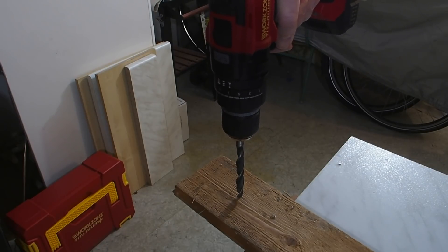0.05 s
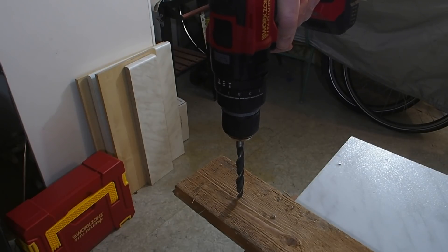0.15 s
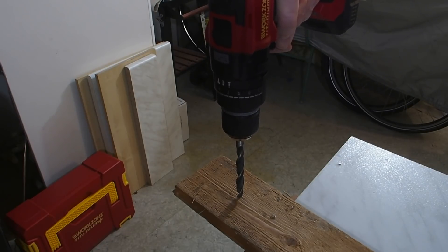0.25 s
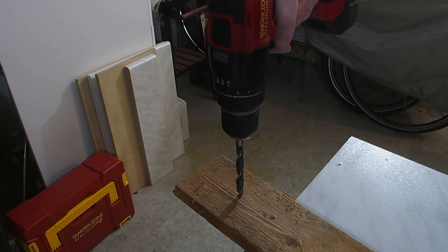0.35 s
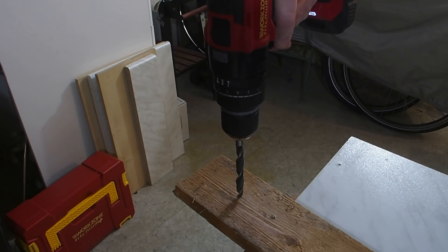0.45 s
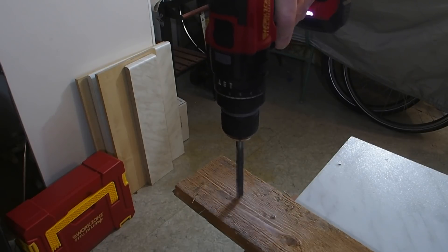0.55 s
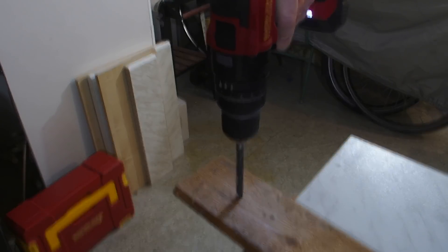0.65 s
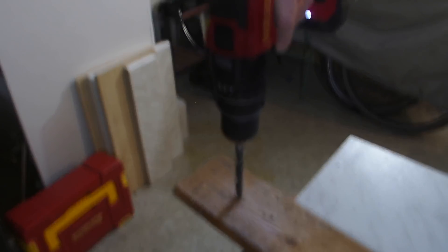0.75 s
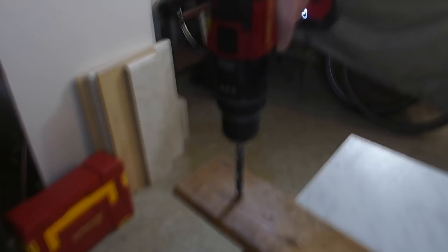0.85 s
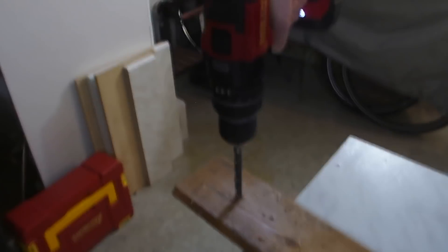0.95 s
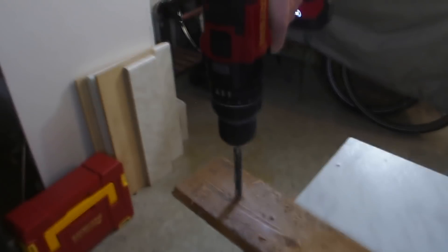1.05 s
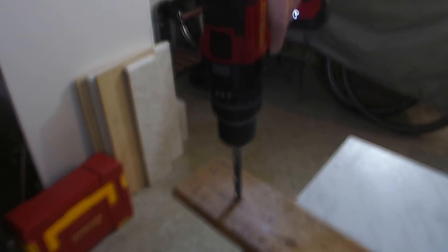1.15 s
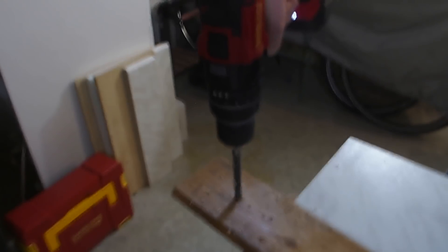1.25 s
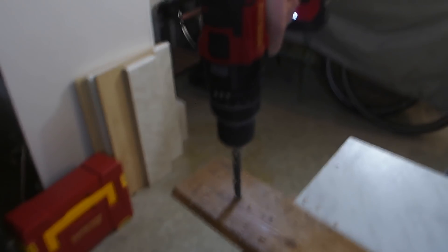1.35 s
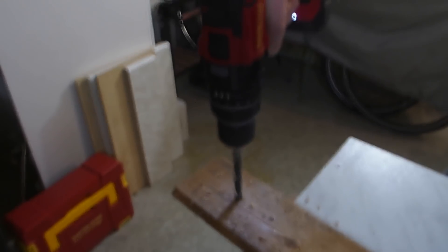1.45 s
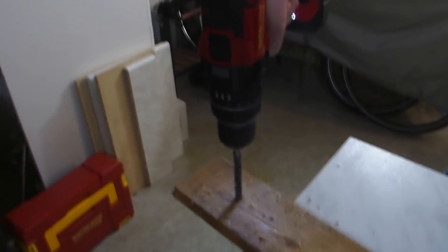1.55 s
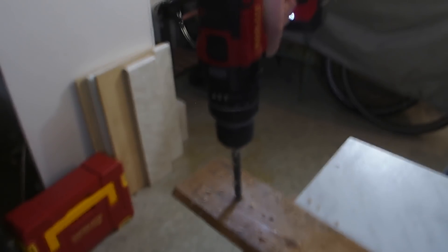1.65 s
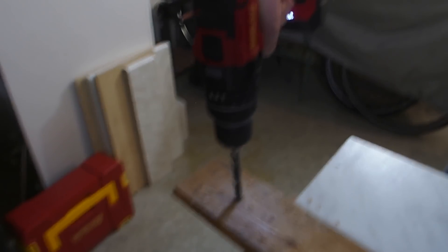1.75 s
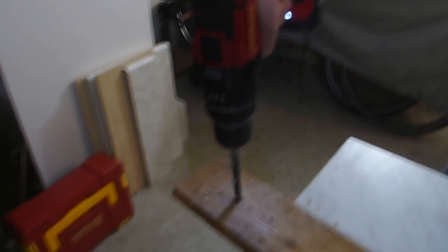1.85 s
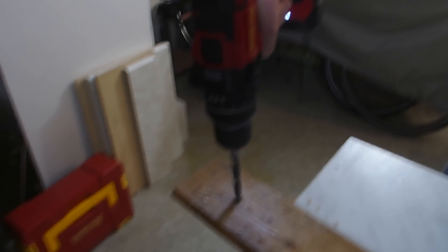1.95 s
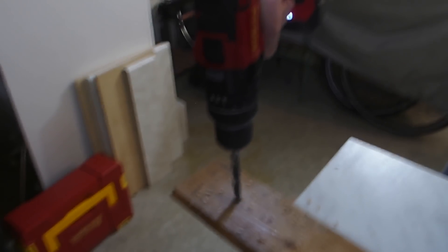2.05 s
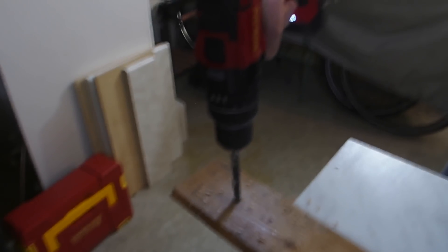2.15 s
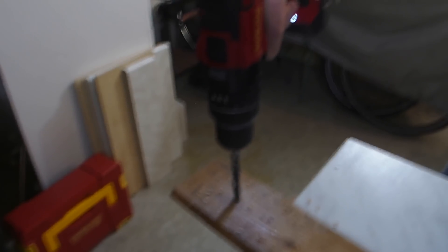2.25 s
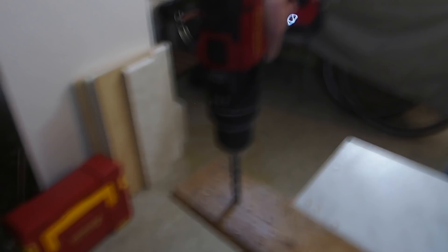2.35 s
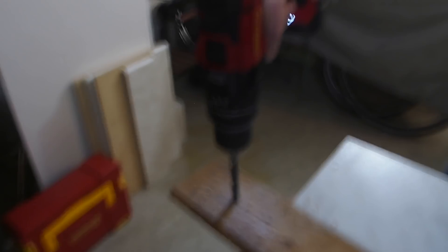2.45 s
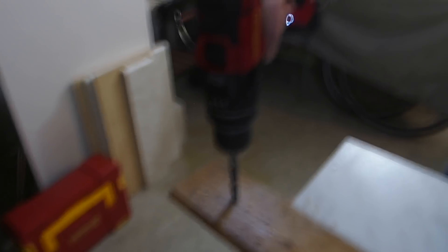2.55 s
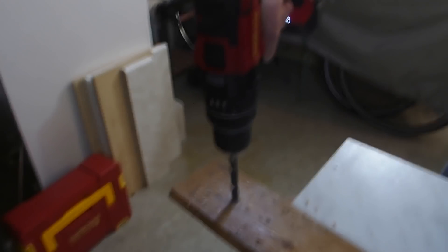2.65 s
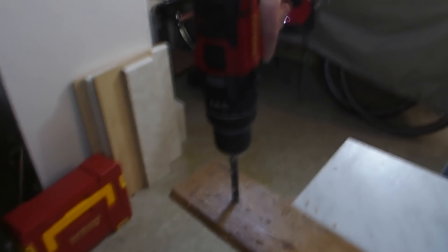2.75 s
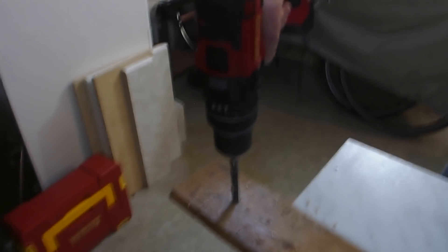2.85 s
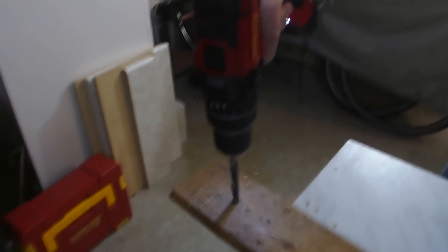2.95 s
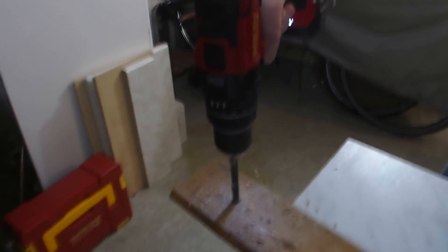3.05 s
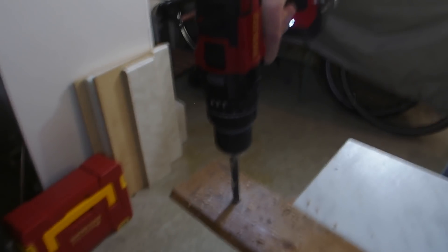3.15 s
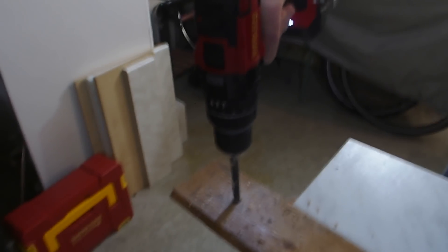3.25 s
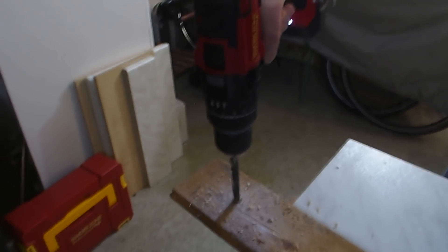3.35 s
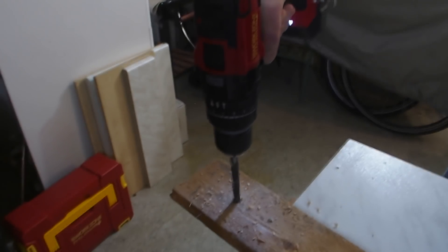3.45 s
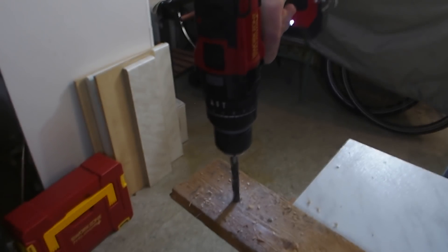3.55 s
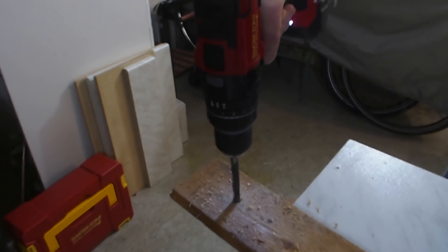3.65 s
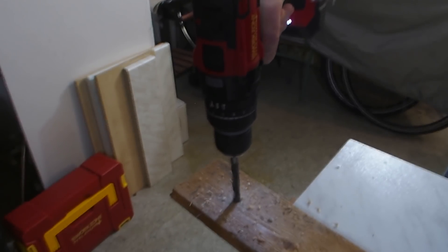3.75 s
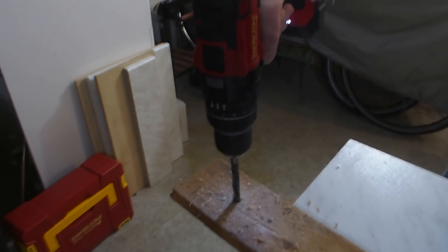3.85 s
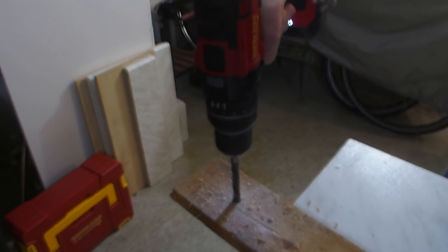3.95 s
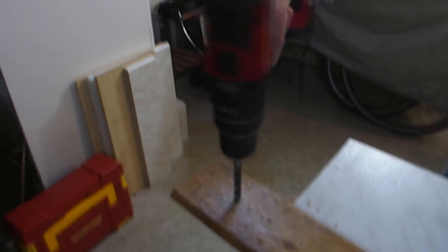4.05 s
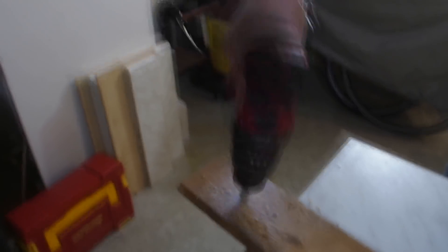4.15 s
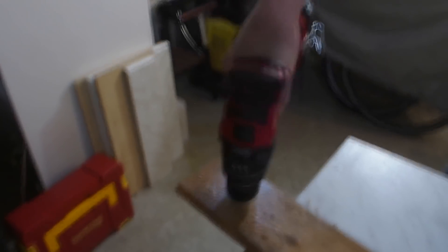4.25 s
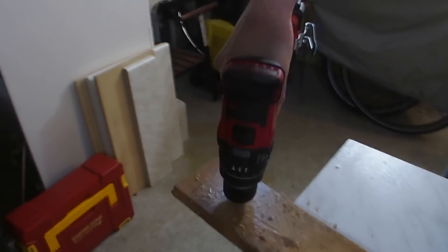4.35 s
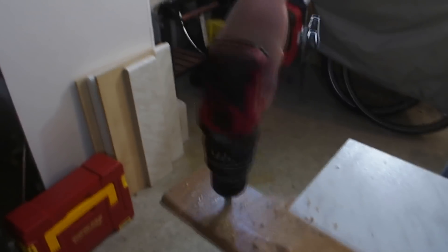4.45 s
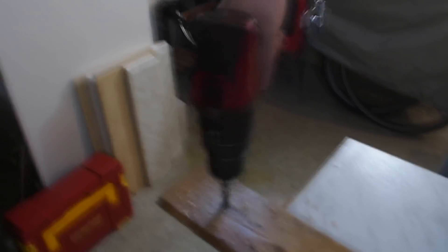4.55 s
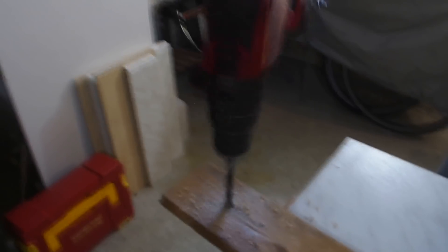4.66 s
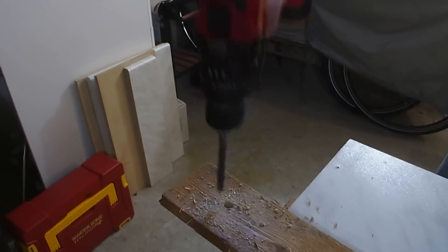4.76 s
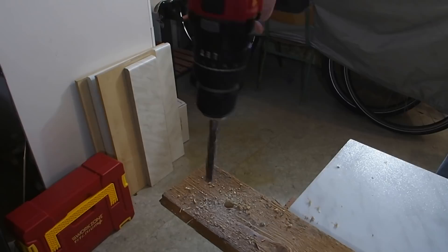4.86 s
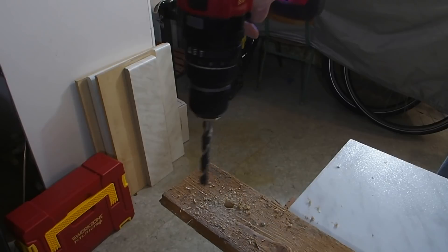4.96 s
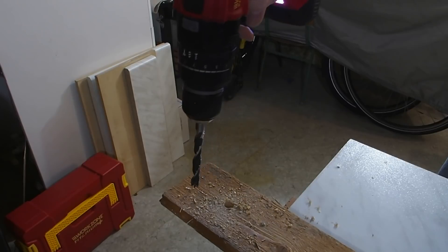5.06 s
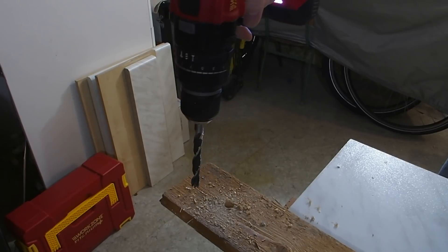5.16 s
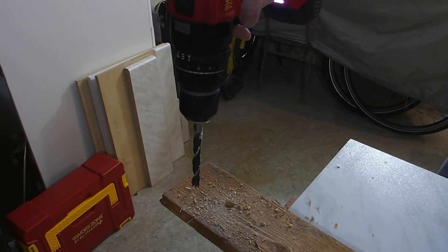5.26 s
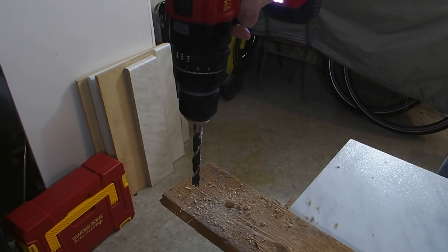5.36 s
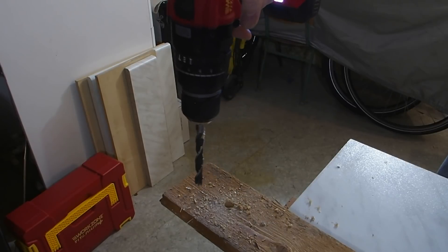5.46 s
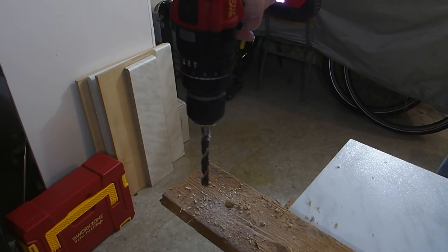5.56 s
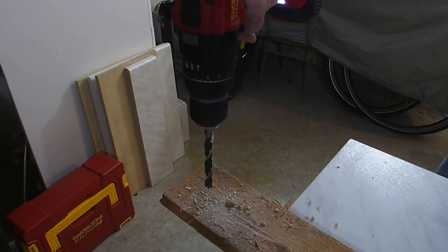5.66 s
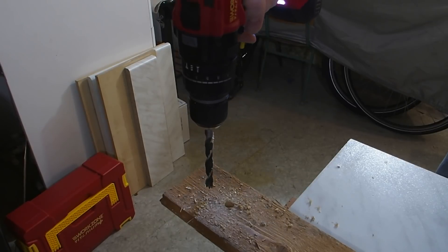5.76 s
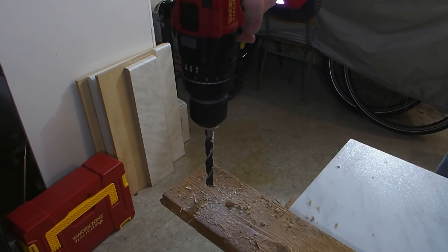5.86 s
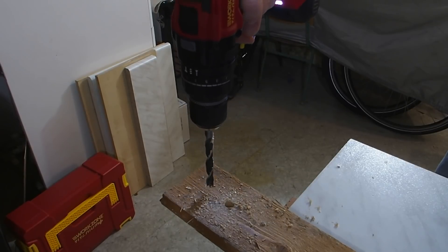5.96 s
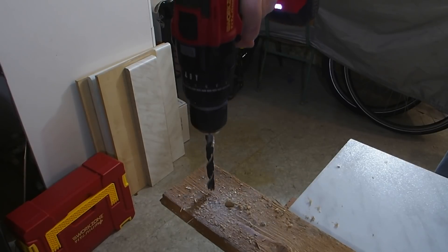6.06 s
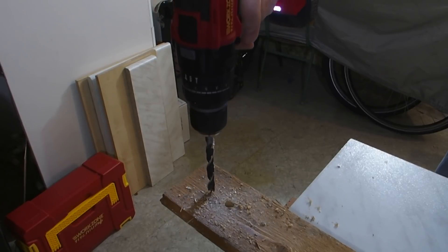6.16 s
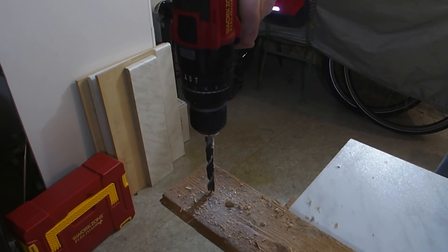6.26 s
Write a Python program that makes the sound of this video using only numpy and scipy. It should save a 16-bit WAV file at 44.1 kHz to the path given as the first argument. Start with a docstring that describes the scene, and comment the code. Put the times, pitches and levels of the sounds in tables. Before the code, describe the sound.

A cordless drill bores into wood with a steady high whine, dips twice, then stops with a sharp clack.

```python
"""Cordless drill boring a plank

On a workshop floor, a drill bogs down in a plank, plunges through, is pulled out and braked.
The motor whines at its pole rate, gears mesh and rattle, the fan and brushes hiss, and the bit
drums the wood once a turn; one rotation phase drives them all, so they slow together under load.
The trigger clicks, and the bit is set down on the wood again, exciting its damped modes."""
import sys
import numpy as np
from scipy import signal
from scipy.fft import rfft, irfft, next_fast_len
from scipy.io import wavfile
from scipy.ndimage import uniform_filter1d

SR = 44100
rng = np.random.default_rng(int(sys.argv[2]) if len(sys.argv) > 2 else 0)


def write(x):
    x = np.atleast_2d(x).T
    wavfile.write(sys.argv[1], SR, np.round(np.clip(x, -1, 1) * 32767).astype(np.int16))


N = 278153
T = np.arange(N) / SR

# Levels in the tables are relative. Spectra of the noises (frequency [Hz], level [dB]):
SHOP_SPECTRUM = [(26, -42.5), (45, -7.5), (202, -6.5), (234, -8.5), (401, -9.5), (539, -15.5), (609, -23),
                 (1020, -15), (1440, -20), (1710, -19), (2660, -25), (3570, -23.5), (5840, -37),
                 (7110, -30.5), (16000, -45.5)]
CASING_SPECTRUM = [(320, -57.5), (550, -28), (810, -19), (898, -12), (1200, -10), (1570, -17), (1780, -11),
                   (1930, -12.5), (2570, -12.5), (2760, -15), (2870, -5.5), (3020, -10), (3120, -13),
                   (4230, -9.5), (5870, -21), (6300, -16.5), (8190, -57.5), (13900, -120)]
FAN_SPECTRUM = [(3470, -47.5), (5900, -17), (6520, -5.5), (7710, -2), (8380, 2), (9380, -1), (11000, -15),
                (12000, -13), (13300, -14.5), (15100, -16), (16000, -31)]
PLANK_SPECTRUM = [(25, -49.5), (42, -16), (70, -12), (91, -4.5), (124, -16.5), (168, -8), (183, -8),
                  (206, -26.5), (240, -2.5), (257, 3.5), (412, -5.5), (573, -19), (622, -34.5),
                  (700, -19.5), (910, -50.5), (1540, -120)]
# Reverberation time (frequency [Hz], T60 [s])
REVERB_T60 = [(200, 0.53), (1000, 0.37), (4000, 0.32), (12000, 0.14)]
# In-phase reverberation, weaker in the bass (frequency [Hz], gain [dB])
REVERB_MID = [(250, -6), (900, 0.5)]
# Antiphase reverberation (frequency [Hz], gain [dB])
REVERB_SIDE = [(60, -14), (130, -14), (280, -27), (700, -15.5), (2500, -7), (6000, -7), (9000, -6),
               (13000, -14.5)]
# Trigger, brake, chuck and bit (time [s], level [dB], pitch [Hz], T60 [s], crack re body [dB])
CLICKS = [(.418, -42, 9500, 0.011, -7), (.431, -43, 6660, .01, -7), (0.458, -43, 1500, .02, -13),
          (0.473, -16.5, 2790, 0.042, -20), (4.055, -13.5, 2560, 0.017, -1), (4.85, -21, 2404, 0.0055, -3),
          (4.862, -14, 1500, 0.0065, -1.5), (4.991, -40, 8070, 0.013, 5), (5.0, -34, 2590, 0.025, -16.5),
          (5.05, -46, 8200, .01, -6), (5.066, -45, 2800, .02, -17), (5.09, -47, 2300, .02, -15),
          (5.194, -34, 3490, 0.0149, -17), (5.197, -32, 3430, 0.011, -1), (5.201, -41, 3320, .02, 3),
          (5.209, -42, 3530, 0.068, -10), (6.07, -45.5, 7500, 0.084, -7), (6.072, -43, 1992, 0.062, -14),
          (6.272, -40, 4270, 0.029, 2)]
# Modes of plank and gearbox (frequency [Hz], level [dB], T60 [s])
PLANK_MODES = [(77, -15, .1), (105, -12.5, 0.076), (175, -11.5, 0.077), (262, -2.5, 0.093),
               (314, -2.5, 0.074), (415, -13.5, 0.037), (520, -9, 0.069), (920, -9.5, 0.021),
               (1260, -12, 0.025), (2110, -21, 0.038)]
GEARBOX_MODES = [(1110, -2, 0.014), (2224, 4, 0.0097), (3400, 0, .006), (4030, -6, 0.058),
                 (4250, 3.5, 0.017), (4608, -9, 0.066), (4800, -10.5, 0.017), (8500, -7, .01)]
# Bit or chuck striking the plank (time [s], level [dB], contact [ms], tilt [dB/octave])
PLANK_KNOCKS = [(4.106, -13, 0.44, 3.5), (4.497, -17, 0.42, 5), (4.542, -12, 0.45, 6),
                (4.605, -19, 0.66, 2), (6.067, -31, 0.59, -7), (6.085, -35.5, 0.57, -6),
                (6.178, -40, 0.74, -8), (6.241, -43.5, 0.75, -10), (6.277, -19.5, 0.91, -5)]
# The brake locking the gears (time [s], level [dB], tilt [dB/octave])
BRAKE_BLOWS = [(4.8491, -5, 2.5), (4.8619, -6, .5)]
# The bit dragging over the plank (time [s], level [dB])
SCRAPE_LEVEL = [(6.05, -85), (6.08, -47), (6.2, -67), (6.31, -37.5)]
# Running noise (time [s], gear rattle [dB], fan and brush hiss [dB])
RUNNING_LEVELS = [(.44, -70, -60), (.48, -25, -37), (.52, -21, -23.5), (.59, -19.5, -21.5), (.66, -25, -26),
                  (.78, -24, -26), (.95, -30, -30), (1.1, -27, -28.5), (1.37, -29, -30), (2.08, -26.5, -27),
                  (2.4, -28.5, -29), (2.6, -26, -27), (3.15, -28.5, -28.5), (3.3, -25, -26),
                  (3.85, -28, -28), (4.05, -24.5, -24.5), (4.12, -27.5, -28.5), (4.31, -25.5, -26.5),
                  (4.53, -30, -33.5), (4.65, -25, -25), (4.76, -29.5, -31), (4.85, -26.5, -29.5)]
# Faint hiss after the stop (time [s], level [dB])
AFTER_HISS_LEVEL = [(4.85, -26.5), (4.9, -46), (5.0, -62), (5.18, -61), (5.3, -67)]
# Drumming of the bit (time [s], main ring [dB], floor thud [dB], upper ring [dB])
DRUM_LEVELS = [(.44, -60.5, -66, -63.5), (.48, -29.5, -37.5, -31.5), (.64, -30.5, -38.5, -35.5),
               (.75, -24.5, -29.5, -31), (.86, -29, -36, -34), (1.4, -30, -39, -35),
               (1.66, -30, -43, -37.5), (2.35, -30.5, -37.5, -34.5), (2.55, -35, -37, -32),
               (2.78, -29, -31, -36), (3.12, -34.5, -42, -35.5), (3.35, -40.5, -40.5, -35),
               (3.8, -38.5, -45, -37.5), (4.06, -26.5, -35.5, -32), (4.2, -36, -30.5, -34),
               (4.27, -30.5, -39, -37.5), (4.43, -24, -35, -27), (4.55, -31, -32.5, -25.5),
               (4.64, -27.5, -34.5, -33.5), (4.73, -53, -61, -53.5), (4.85, -52.5, -54, -49)]
# Part of the drumming that repeats each turn (time [s], power share [0-1])
DRUM_REPEAT = [(.5, .35), (1.55, .45), (1.75, .9), (2.25, .85), (2.4, .6), (2.95, .7), (3.15, .93),
               (3.85, .93), (3.95, .3), (4.8, .3)]
# Squeal of the speed control (time [s], level [dB])
CHOPPER_LEVEL = [(.44, -80.5), (.45, -48), (.47, -34), (.54, -27.5), (.6, -41.5), (.63, -72.5)]
# Drive tones (time [s], gear mesh [dB], its octave [dB], gain of the motor orders [dB])
DRIVE_LEVELS = [(.6, -49, -46, -5.5), (1.5, -52, -44.5, -7.5), (1.7, -47, -40.5, -1.5),
                (2.4, -48.5, -40, 0), (2.7, -62, -48, 0), (3.0, -44, -41.5, 1.5), (3.4, -42.5, -36, -1.5),
                (3.94, -39, -38, 3), (4.0, -57, -47, -24)]
# Motor orders (frequency [multiple of the shaft rate], level [dB])
SHAFT_ORDERS = [(1, -48), (4, -48), (6, -51), (11.25, -41), (11.8, -45), (12.3, -44)]
# The wood gripping the bit (time of deepest sag [s], whine sag [Hz], onset [s], recovery [s])
LOAD_SAGS = [(.63, 44.95, 0.0502, 0.0498), (0.749, 35.04, 0.1004, .25), (1.083, 130.1, .045, .08),
             (1.25, 95, .045, .04), (1.45, 59.86, .25, .15), (2.26, 49.6, 0.03944, 0.041),
             (2.35, 85.1, .08, .12), (2.585, 70.05, .06, .12), (2.752, 169.5, .025, .2),
             (3.9, 30.07, .25, .1), (4.068, 929.3, .055, .135), (4.216, 229.4, 0.049, 0.037),
             (4.29, 120.2, .04, .1), (4.55, 880.3, .085, .065)]
# Gain of the whine and its overtones by frequency, with a deep gap near 5.9 kHz (frequency [Hz], gain [dB])
WHINE_RESPONSE = [(2000, -3), (2200, -2), (2380, 2), (2550, 0), (2750, -1), (3000, 0.5), (4200, -24),
                  (5400, -24), (5680, -15.5), (5800, -25), (5900, -34), (6500, -25.5), (8200, -21.5),
                  (8550, -13.5), (8800, -18.5), (9200, -14), (10200, -11), (11000, -30.5), (11550, -37.5),
                  (11750, -26.5)]
# Whine at full speed (time [s], level [dB])
WHINE_LEVEL = [(.55, -24), (.61, -16), (.65, -17), (.93, -19.5), (1.14, -20), (1.5, -19.5), (1.73, -23.5),
               (1.96, -20), (2.3, -22), (2.9, -22), (3.17, -22), (3.64, -23.5), (3.97, -22), (4.06, -25),
               (4.11, -25.5), (4.22, -25.5), (4.27, -18.5), (4.4, -19), (4.5, -32), (4.6, -30),
               (4.64, -19.5), (4.71, -19.5), (4.76, -28), (4.85, -25)]
# Stereo balance of the whine (time [s], left minus right [dB])
WHINE_BALANCE = [(0.55, 2.5), (0.93, -6), (1.16, 4.5), (1.67, -8.5), (1.78, -1), (2.94, 4.5), (3.09, -14.5),
                 (3.23, 0), (3.47, -13.5), (4.2, -0.5), (4.85, -1.0)]

FREE_WHINE_HZ = 2941  # no load on the bit
POLES, CYCLES_PER_BIT_TURN = 8, 114.3  # whine cycles in one motor turn and in one bit turn


def undb(db):
    """Amplitude ratio of a level in decibels."""
    return 10 ** (np.asarray(db) / 20)


def unit(x):
    """Normalisation to unit RMS."""
    return x / np.sqrt(np.mean(x ** 2))


def curves(table, left=-120, right=-120):
    """Linear interpolation of each column in time; left and right apply outside the table."""
    times, *columns = np.transpose(table)
    return [np.interp(T, times, column, left, right) for column in columns]


def at_hz(points, hz):
    """Interpolation on a logarithmic frequency axis."""
    frequencies, values = np.transpose(points)
    return np.interp(np.log(hz), np.log(frequencies), values)


def colour(x, points):
    """Zero-phase filtering by (frequency [Hz], gain [dB]) points."""
    size = next_fast_len(x.shape[-1])
    hz = np.maximum(np.fft.rfftfreq(size, 1 / SR), 1)
    return irfft(rfft(x, size) * undb(at_hz(points, hz)), size)[..., :x.shape[-1]]


def walk(rate_hz):
    """Random modulation: sample-and-hold noise, smoothed twice, at unit RMS."""
    hold = int(SR / rate_hz)
    steps = np.repeat(rng.standard_normal(N // hold + 1), hold)
    return unit(uniform_filter1d(uniform_filter1d(steps, hold), hold)[:N])


def ring(modes, tilt_db, detune=0.014):
    """Modal impulse response: damped sinusoids, neighbours in opposite phase, at unit peak."""
    t = np.arange(SR // 5) / SR
    hz, db, t60 = np.transpose(modes)[:, :, None]
    detuned_hz = hz * (1 + detune * rng.standard_normal(hz.shape))
    gain = undb(db + tilt_db * np.log2(hz / 3000)) * (-1.) ** np.arange(len(hz))[:, None]
    response = np.sum(gain * np.sin(2 * np.pi * detuned_hz * t) * undb(-60 * t / t60), axis=0)
    return response / np.max(np.abs(response))


def add(out, x, start_s):
    """Superposition of an event on a signal."""
    i = int(start_s * SR)
    out[i:i + len(x)] += x[:N - i]


def workshop(level_db=-56.5):
    """Ambient noise: a quiet broadband floor, partly coherent between the channels."""
    mid, side = colour(rng.standard_normal((2, N)), SHOP_SPECTRUM)
    return undb(level_db + walk(6.5)) * unit(mid + .5 * side * np.array([[1], [-1]]))


def reverberation(x, mid_db=-8.5):
    """Diffuse field: convolution with noise that decays exponentially in each octave band."""
    t = np.arange(SR // 2) / SR
    onset = np.minimum(t / 0.00061, 1)
    tails = 0
    for hz in 125 * 2. ** np.arange(8):
        edges_hz = [hz / np.sqrt(2), min(hz * np.sqrt(2), .45 * SR)]
        band = signal.butter(2, edges_hz, "bandpass", fs=SR, output="sos")
        decay = onset * undb(-60 * t / at_hz(REVERB_T60, hz))
        tails = tails + decay * signal.sosfilt(band, rng.standard_normal((2, len(t))))
    tails = tails / np.sqrt(np.sum(tails ** 2, axis=1, keepdims=True))
    mid, side = signal.fftconvolve(x[None], tails, axes=1)[:, :N]
    return undb(mid_db) * colour(mid, REVERB_MID) + colour(side, REVERB_SIDE) * np.array([[1], [-1]])


def clicks():
    """Damped transients: noise in one broad resonance plus a broadband crack."""
    out = np.zeros(N)
    t = np.arange(SR // 5) / SR
    crack_band = signal.butter(2, [2000, 10500], "bandpass", fs=SR)
    for start_s, db, hz, t60, crack_db in CLICKS:
        body, crack = rng.standard_normal((2, len(t)))
        body = unit(signal.lfilter(*signal.iirpeak(hz, Q=5, fs=SR), body))
        crack = unit(signal.lfilter(*crack_band, crack))
        add(out, undb(db) * (body + undb(crack_db) * crack) * undb(-60 * t / t60), start_s)
    return out


def plank_knocks():
    """Impact excitation: the longer the contact, the weaker the plank's high modes."""
    out = np.zeros(N)
    for start_s, db, contact_ms, tilt_db in PLANK_KNOCKS:
        force = np.hanning(int(contact_ms * SR / 1000) + 2)
        knock = np.convolve(ring(PLANK_MODES, tilt_db), force)
        add(out, undb(db) * knock / np.max(np.abs(knock)), start_s)
    return out


def brake_clack():
    """Free vibration: the gearbox rings as the brake locks the gear train."""
    out = np.zeros(N)
    for start_s, db, tilt_db in BRAKE_BLOWS:
        add(out, undb(db) * ring(GEARBOX_MODES, tilt_db), start_s)
    return out


def bit_scrape():
    """Friction noise: the dragged bit drives the plank's resonances unevenly."""
    level_db, = curves(SCRAPE_LEVEL, right=None)
    friction = undb(5 * walk(40)) * rng.standard_normal(N)
    return undb(level_db) * unit(colour(friction, PLANK_SPECTRUM))


def pulsed_noise(cycles, spectrum, depth, flicker_db):
    """Amplitude modulation: coloured noise pulses with each motor turn and each bit turn."""
    motor_pulse = 1 + depth * np.sin(2 * np.pi * cycles / POLES)
    bit_pulse = 1 + 0.064 * np.sin(2 * np.pi * cycles / CYCLES_PER_BIT_TURN)
    envelope = motor_pulse * bit_pulse * undb(flicker_db * walk(20))
    return unit(colour(envelope * rng.standard_normal(N), spectrum))


def rattle_and_hiss(cycles, slowed_db=-1.5):
    """Broadband machine noise: gears rattle in the casing's resonances; fan and brushes hiss."""
    gears_db, fan_db = curves(RUNNING_LEVELS)
    after_hiss = undb(curves(AFTER_HISS_LEVEL)[0])
    speed = np.gradient(cycles) * SR / FREE_WHINE_HZ
    slowed = np.clip(3 - 3 * speed, 0, 1) * (T > 1)  # reaches 1 at two thirds of free speed
    rattle = pulsed_noise(cycles, CASING_SPECTRUM, depth=0.38, flicker_db=-0.02)
    hiss = pulsed_noise(cycles, FAN_SPECTRUM, depth=0.13, flicker_db=0.5)
    return (undb(gears_db + slowed_db * slowed) + after_hiss) * rattle + (undb(fan_db) + after_hiss) * hiss


def cutting_force(turns, memory=0.85, steps=64):
    """Quasi-periodic force: the flutes meet nearly the same grain on every turn."""
    fresh_grain = rng.standard_normal((160, steps))  # one row a turn
    pattern = signal.lfilter([1], [1, -memory], fresh_grain, axis=0)
    pattern[:, 0] += 11  # the leading edge strikes at the same angle each turn
    return np.interp(turns * steps, np.arange(pattern.size), pattern.ravel())


def bit_drumming(cycles, hum_db=-46.5):
    """Forced vibration: the repeating cut and random chips drive the plank."""
    turns = cycles / CYCLES_PER_BIT_TURN
    repeat, = curves(DRUM_REPEAT, left=0, right=0)
    cut = unit(colour(cutting_force(turns), PLANK_SPECTRUM))
    chips = unit(colour(undb(2.5 * walk(24.85)) * rng.standard_normal(N), PLANK_SPECTRUM))
    drum = np.sqrt(repeat) * cut + np.sqrt(1 - repeat) * chips
    # pressure and hole depth shift the drumming between three bands
    main_db, thud_db, upper_db = curves(DRUM_LEVELS)
    thud = colour(drum, [(195, 0), (220, -60)])
    upper = colour(drum, [(315, -60), (345, 0)])
    main = drum - thud - upper
    # the two flutes shake the floor twice a turn while the cut is even
    hum = undb(hum_db) * repeat ** 2 * np.sin(4 * np.pi * turns)
    return hum + undb(main_db) * unit(main) + undb(thud_db) * unit(thud) + undb(upper_db) * unit(upper)


def chopper_squeal(cycles, chopper_hz=10030):
    """Sidebands: the speed control's chopper beats against the motor's electrical rate."""
    level_db, = curves(CHOPPER_LEVEL)
    carrier = 2 * np.pi * chopper_hz * T
    electrical = np.pi * cycles  # half the pole rate
    return undb(level_db) * (np.sin(carrier - electrical) + 0.24 * np.sin(carrier + electrical))


def drive_tones(cycles, teeth=35):
    """Rotational orders: tones at multiples of the shaft rate, the tooth-mesh rate and its octave."""
    *mesh_db, orders_db = curves(DRIVE_LEVELS)
    shaft_phase = 2 * np.pi * cycles / POLES
    mesh_phase = 2 * np.pi * teeth * cycles / CYCLES_PER_BIT_TURN
    orders = sum(undb(db + orders_db + 3 * walk(3)) * np.sin(k * shaft_phase) for k, db in SHAFT_ORDERS)
    mesh = sum(undb(db + 1.5 * walk(30)) * np.sin(k * mesh_phase + 0.5 * walk(40))
               for k, db in enumerate(mesh_db, start=1))
    return orders + mesh


def motor_cycles(start_s=.452, release_s=4.693, brake_s=4.85, rise_hz_per_s=20300, fall_hz_per_s=5600):
    """Phase as the integral of frequency: whine cycles through run-up, load, coasting and braking."""
    knee = 10.5  # sharpness of the bend from run-up to free speed
    ramp_hz = np.maximum(rise_hz_per_s * (T - start_s), 1)
    hz = (ramp_hz ** -knee + FREE_WHINE_HZ ** -knee) ** (-1 / knee)
    hz -= fall_hz_per_s * np.maximum(T - release_s, 0)
    for time_s, sag_hz, onset_s, recovery_s in LOAD_SAGS:
        width_s = np.where(T < time_s, onset_s, recovery_s)
        hz -= sag_hz * np.exp(-((T - time_s) / width_s) ** 2)
    hz = np.maximum(hz, 0) * (T < brake_s)
    tremble = 1 + 0.00097 * walk(60)
    return np.cumsum(uniform_filter1d(hz, SR // 100) * tremble) / SR


def motor_whine(cycles, resonance_hz=2365, width_hz=30):
    """Source and filter: four harmonics of the pole rate, weighted by a gain over frequency."""
    level_db, = curves(WHINE_LEVEL)
    balance_db, = curves(WHINE_BALANCE, left=None, right=None)
    hz = np.maximum(np.gradient(cycles) * SR, 1)
    # the more the load slows the motor, the more the whine throbs and flutters
    load = np.clip((FREE_WHINE_HZ - 40 - hz) / 180, 0, 1)
    throb = (0.16 + 0.19 * load) * np.sin(2 * np.pi * cycles / CYCLES_PER_BIT_TURN)
    flutter = (0.081 + 0.4 * load) * walk(50)
    phase = 2 * np.pi * cycles + (.03 + .3 * load) * walk(120)
    whine = sum(undb(at_hz(WHINE_RESPONSE, k * hz)) * np.sin(k * phase) for k in (1, 2, 3, 4))
    # it fades as the motor is dragged down, except where it crosses a casing resonance
    fade_db = -10 * np.clip((FREE_WHINE_HZ - hz - 170) / 250, 0, 1)
    resonance_db = 5.5 * np.exp(-((hz - resonance_hz) / width_hz) ** 2)
    whine *= undb(level_db + fade_db + resonance_db) * (1 + throb + flutter)
    return whine * undb(np.array([balance_db, -balance_db]) / 2)


def scene():
    """Superposition of the drill's direct sound, its reverberation and the ambient noise."""
    cycles = motor_cycles()
    noise = rattle_and_hiss(cycles) + bit_drumming(cycles)
    impacts = plank_knocks() + brake_clack() + clicks()
    noise += signal.lfilter(*signal.butter(2, 9000, fs=SR), impacts)  # duller than the fan
    noise += bit_scrape()
    # a narrow band of treble near 6 kHz is hollowed out
    noise = signal.lfilter(*signal.iirnotch(6050, Q=12, fs=SR), noise)
    tones = np.sqrt(2) * (motor_whine(cycles) + drive_tones(cycles) + chopper_squeal(cycles))
    direct = tones + noise * undb([[-1], [0]])
    return direct + reverberation(noise + undb(-7) * tones.mean(axis=0)) + workshop()


def record(dry, cutoff_hz=15900):
    """Band limiting: a steep elliptic low-pass removes the highest treble."""
    return signal.sosfilt(signal.ellip(10, .2, 80, cutoff_hz, fs=SR, output="sos"), dry)


dry = scene()
out = record(dry)
write(out)
```